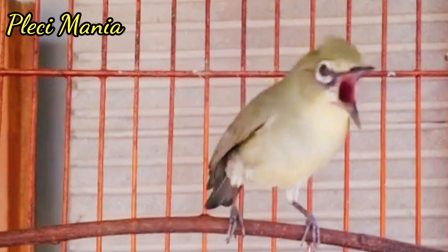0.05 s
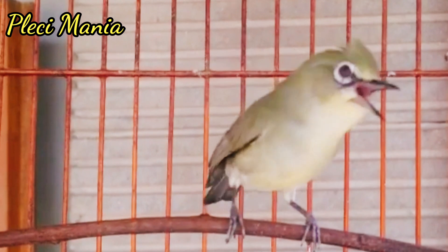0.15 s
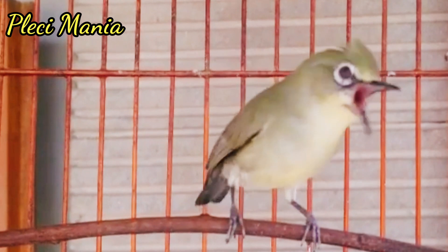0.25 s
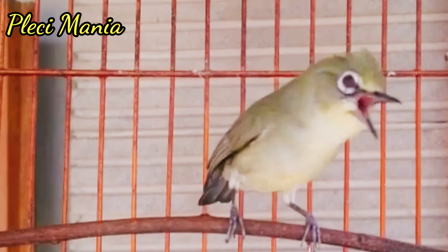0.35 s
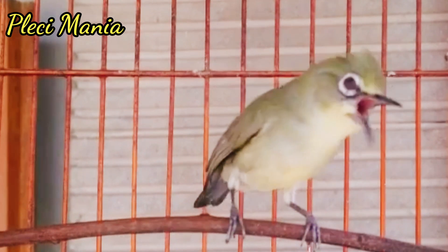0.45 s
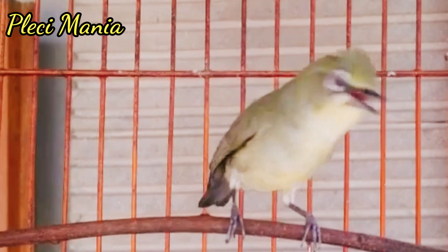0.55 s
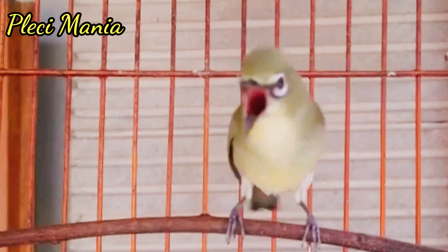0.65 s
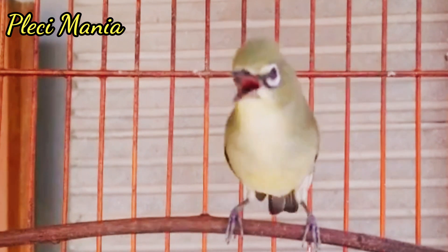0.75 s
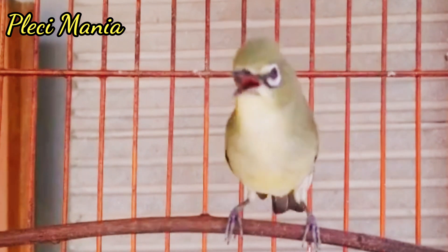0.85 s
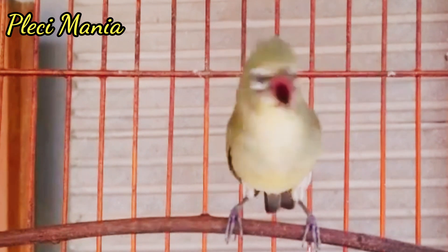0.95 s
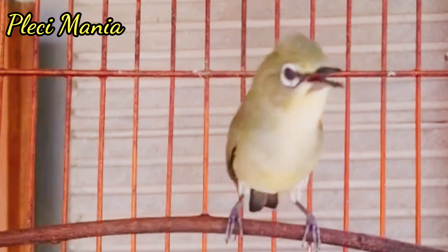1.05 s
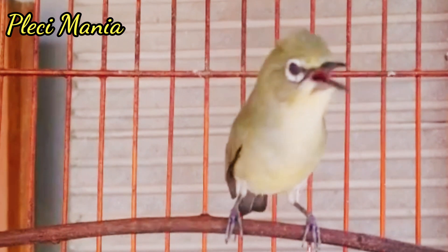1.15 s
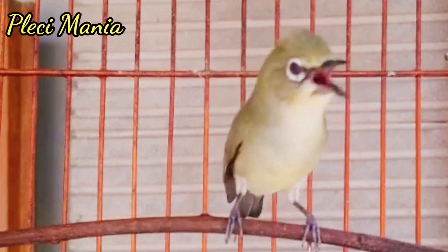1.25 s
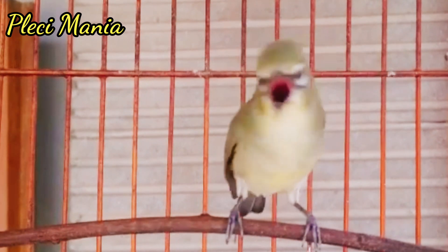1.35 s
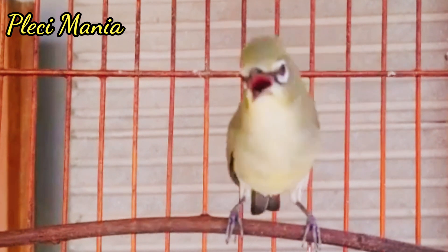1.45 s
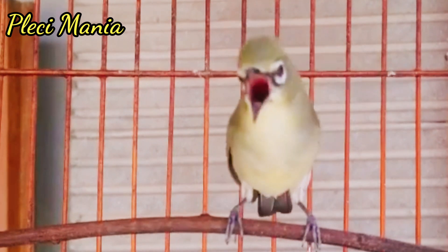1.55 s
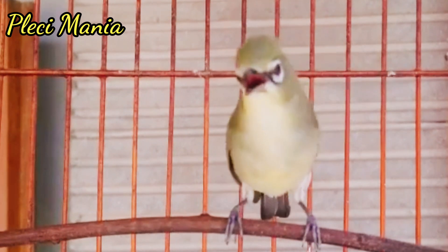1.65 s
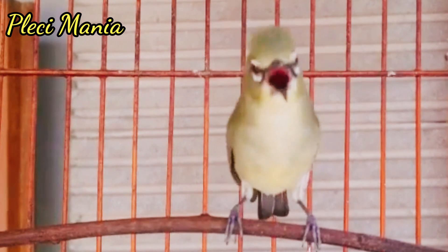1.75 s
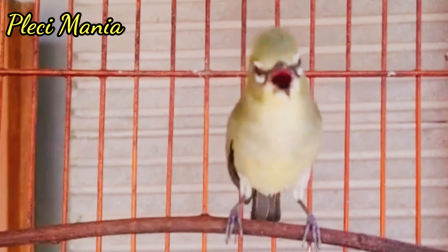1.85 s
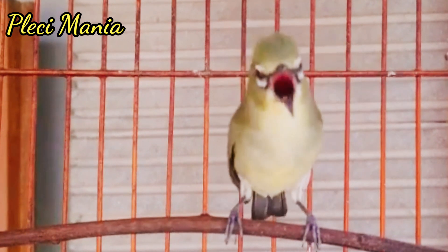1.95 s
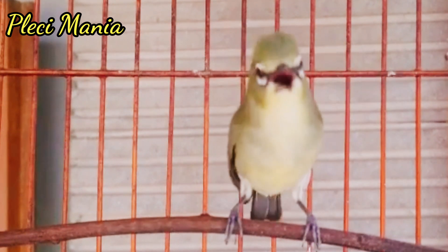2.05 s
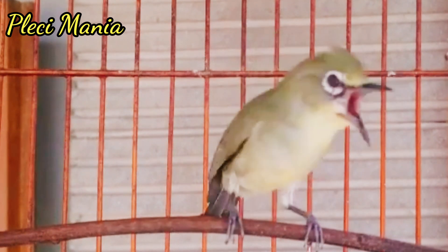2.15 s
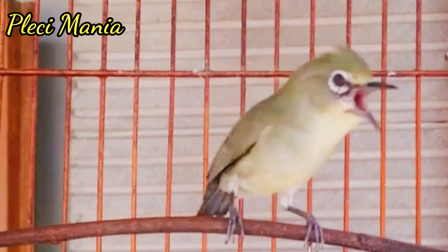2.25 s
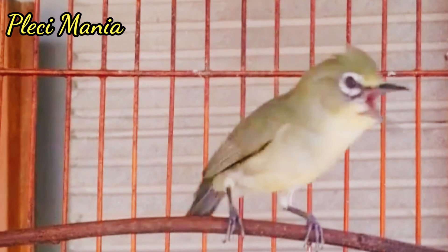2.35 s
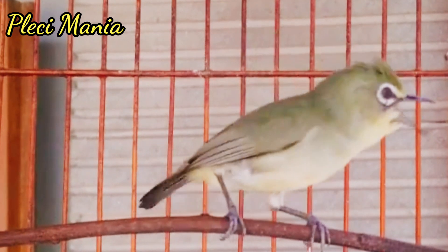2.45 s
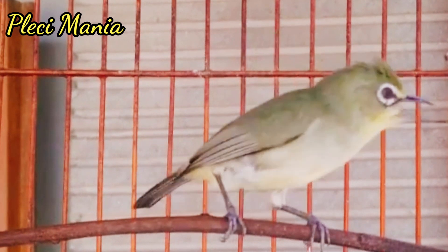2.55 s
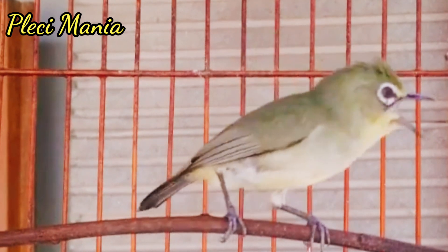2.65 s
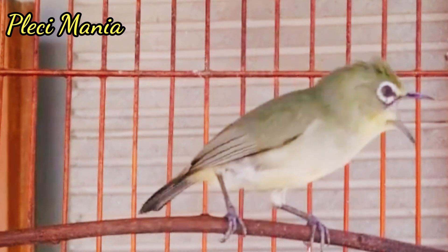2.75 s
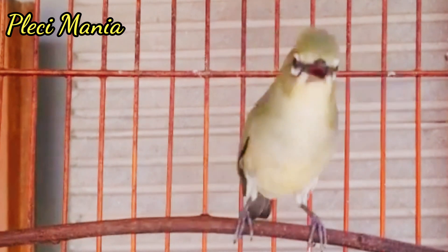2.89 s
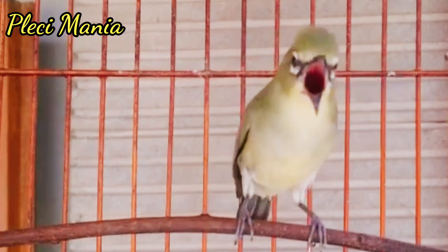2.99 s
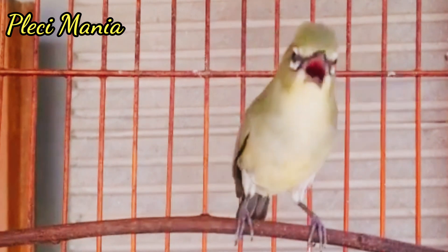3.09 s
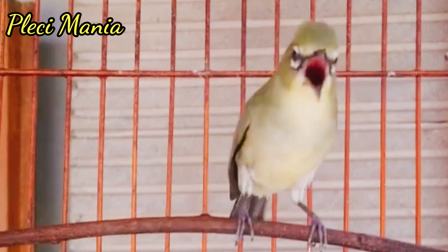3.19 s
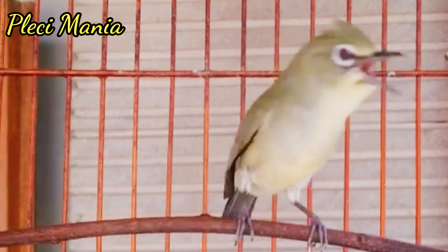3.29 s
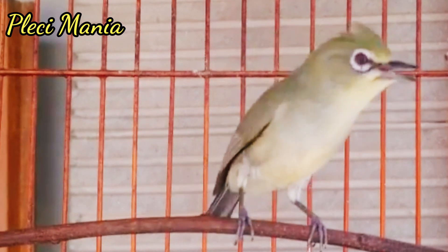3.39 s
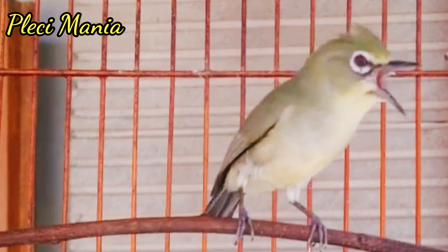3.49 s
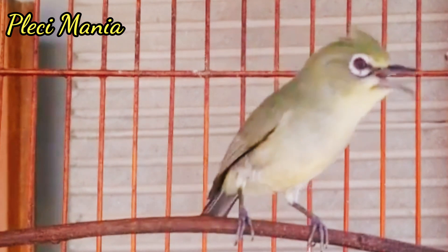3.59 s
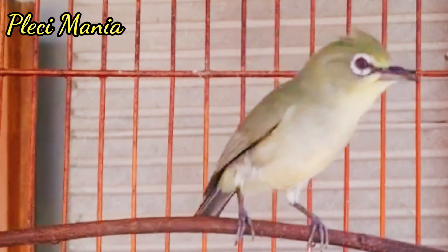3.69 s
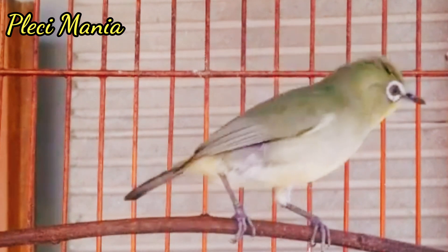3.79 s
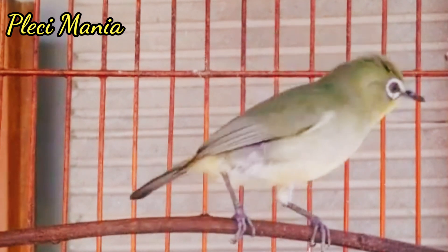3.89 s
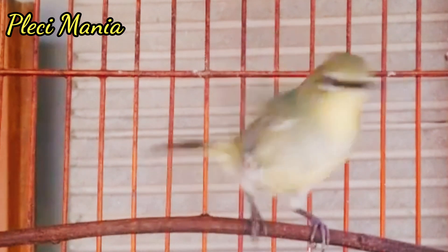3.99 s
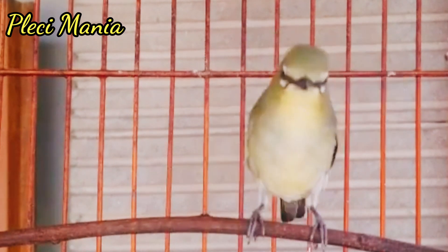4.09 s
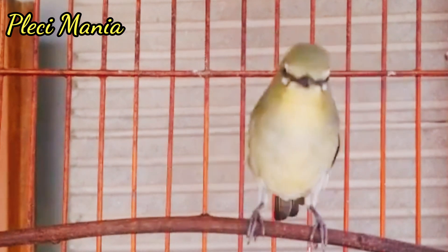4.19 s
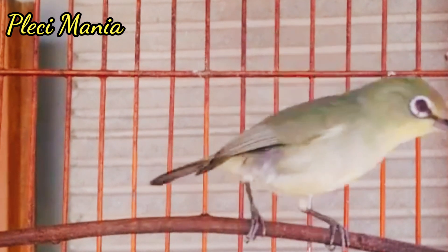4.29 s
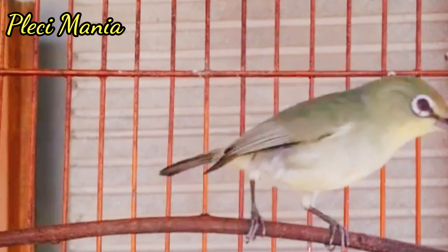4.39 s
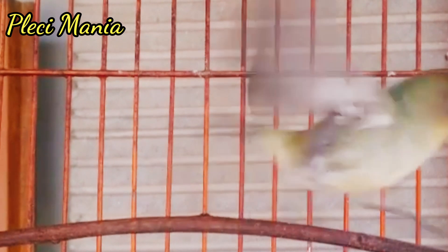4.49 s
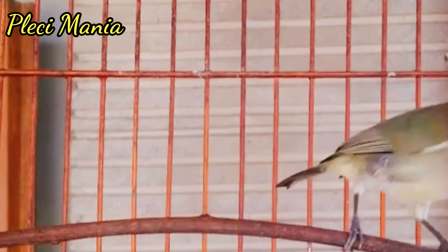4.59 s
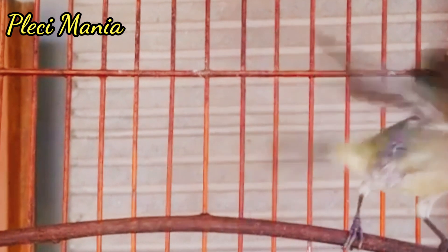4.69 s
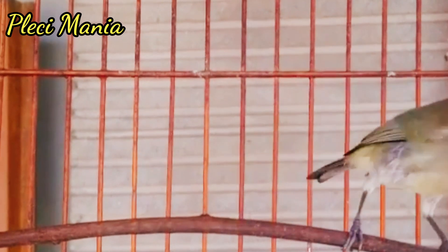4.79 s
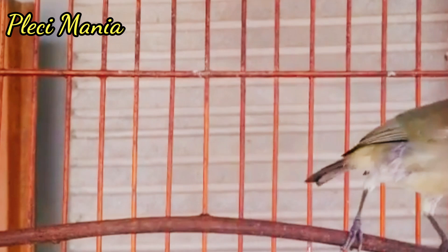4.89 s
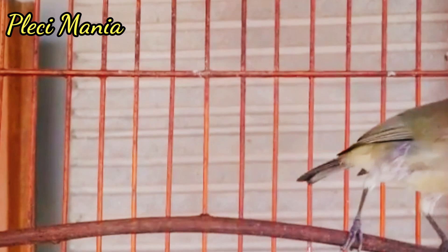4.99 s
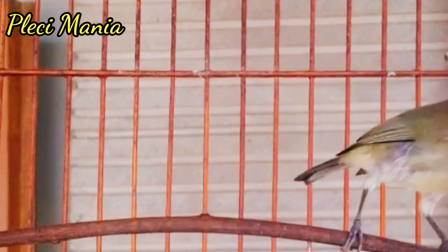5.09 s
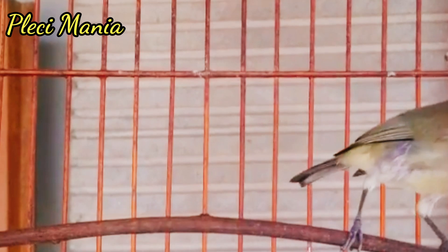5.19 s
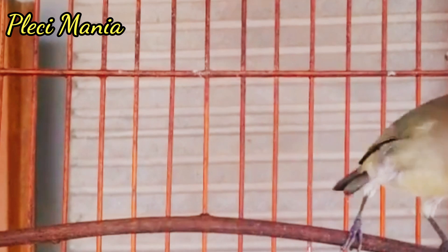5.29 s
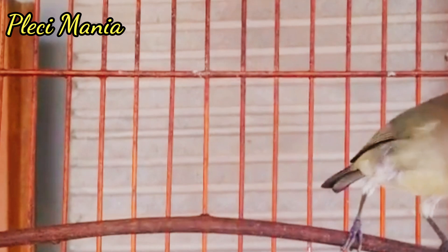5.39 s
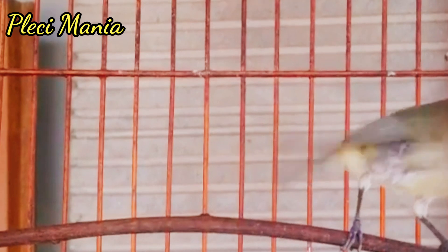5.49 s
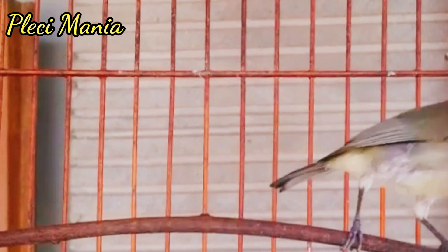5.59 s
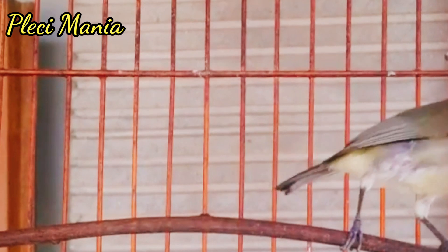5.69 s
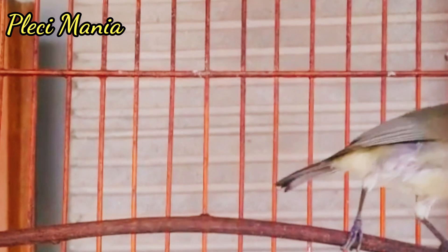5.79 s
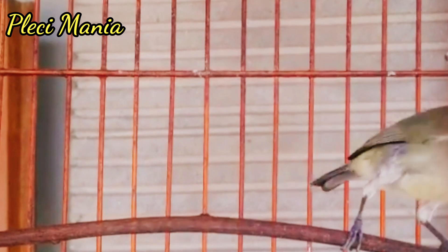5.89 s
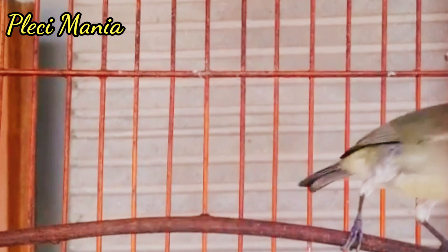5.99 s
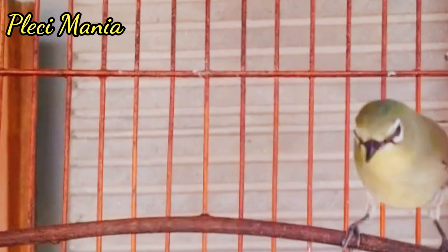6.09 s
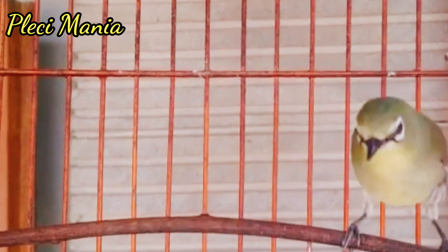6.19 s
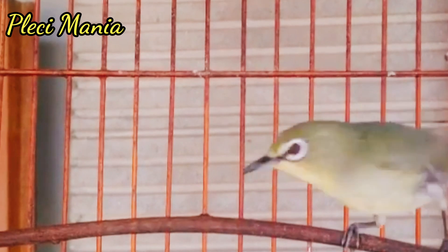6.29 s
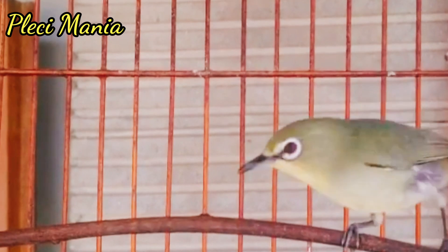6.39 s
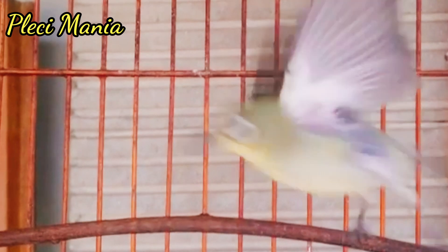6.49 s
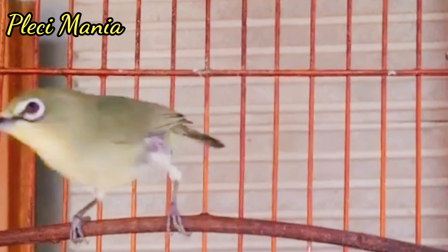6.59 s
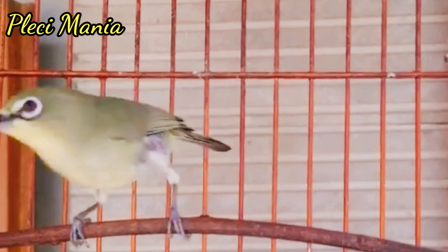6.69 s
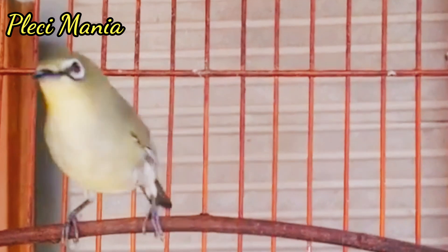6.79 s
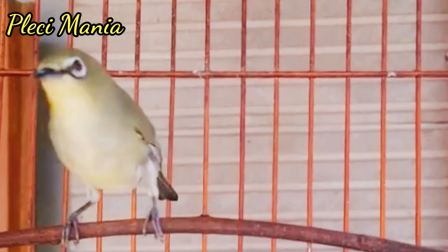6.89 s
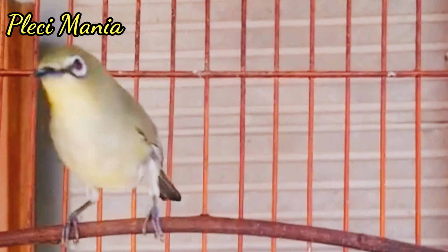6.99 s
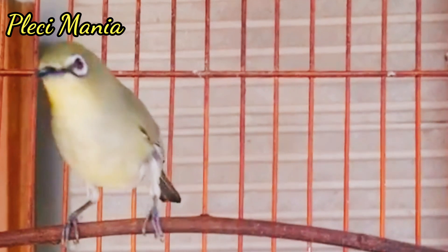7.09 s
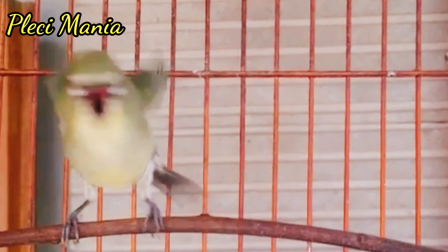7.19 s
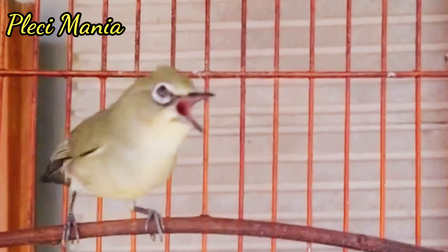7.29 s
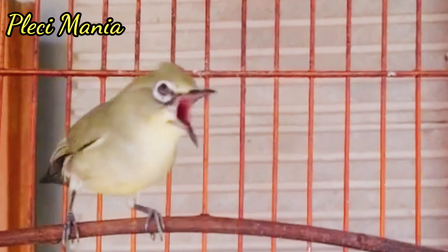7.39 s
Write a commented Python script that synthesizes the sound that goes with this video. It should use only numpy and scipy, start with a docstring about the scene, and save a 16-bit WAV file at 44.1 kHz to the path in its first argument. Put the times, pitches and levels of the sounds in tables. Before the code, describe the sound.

Outdoors in a quiet yard, a little bird delivers eighteen crisp, piercing chirps in quick succession, most diving from very high to high pitch, a couple bending upward. Then it falls silent. Low, dull town noise and a faint passing vehicle remain, with tiny far-off bird calls blurred by echo and a barely audible shuffle on the perch. A final bright chirp is cut off at the end.

```python
"""A small caged songbird sings quick falling whistles close to a two-microphone phone, pauses, then starts again.
Each note is a gliding sine with a faint half-pitch line and overtones; decaying noise makes the cage and yard echo.
The bird shifts on its perch in bursts of noise, and far birds are short whistles heard only through echoes.
A vehicle drifts past as two wavering sines, over a town made of flickering bands of noise."""
import sys
import numpy as np
from scipy import signal
from scipy.fft import rfft, irfft
from scipy.io import wavfile
from scipy.ndimage import uniform_filter1d

SR = 44100
rng = np.random.default_rng(int(sys.argv[2]) if len(sys.argv) > 2 else 0)


def master(y):
    """Save y as 16-bit WAV."""
    cut = np.clip(np.atleast_2d(y).T, -1, 1)
    pcm = np.round(cut * 32767)  # scale
    wavfile.write(sys.argv[1], SR, pcm.astype(np.int16))


def level_to_linear(level):
    """Convert decibel levels to linear amplitude factors, elementwise."""
    exponent = np.asarray(level, float) / 20
    return 10 ** exponent


N = 328545
T = np.arange(N) / SR

# how loud each pitch leaves throat, beak and cage: f/Hz, level/dB
THROAT_RESPONSE = [(3000, -34), (3500, -10.5), (4000, -2.5), (4420, 1.5), (4780, -6), (5200, -0.02),
                   (5850, 5), (6350, -5), (6800, -3), (7250, 1.5), (7700, -5.5), (8100, -14.5), (9300, -25)]


def singer():
    """Each note is a gliding sine with faint rough partials; returns both microphones and the sound sent to the yard."""
    # pitch of each note from its top on, one list per note: t/s, f/Hz
    song = [
        [(.211, 9410), (.216, 7920), (.232, 7200), (.245, 5670), (.252, 5790), (.258, 5330), (.308, 5016),
         (.321, 4660), (.368, 4640)],
        [(.432, 9170), (.458, 7160), (.486, 7170), (.495, 6040), (.505, 5910), (.529, 6030), (.54, 5050),
         (.571, 4890), (.588, 5040)],
        [(.637, 7780), (.646, 6860), (.659, 6550), (.664, 5650), (.67, 5200), (.695, 5040), (.702, 4440),
         (.74, 3940), (.759, 4120), (.766, 3900)],
        [(.832, 7820), (.838, 7180), (.852, 6700), (.864, 5710), (.88, 5170), (.885, 5860), (.895, 4740),
         (.917, 4560), (.94, 4040)],
        [(.982, 6480), (.99, 6140), (.994, 5600), (1.001, 5600), (1.006, 4590), (1.017, 4600), (1.021, 4150),
         (1.047, 3720), (1.061, 3570)],
        [(1.114, 7780), (1.118, 6880), (1.127, 6380), (1.132, 6440), (1.141, 5200), (1.181, 5194),
         (1.186, 4570), (1.195, 4500), (1.2, 4630), (1.207, 4110), (1.233, 4030)],
        [(1.288, 2870), (1.298, 3490), (1.31, 3900), (1.335, 4200), (1.347, 4120), (1.355, 4640), (1.372, 4590),
         (1.383, 4165), (1.39, 5220), (1.402, 5415), (1.415, 4580)],
        [(1.493, 9170), (1.512, 7240), (1.517, 7800), (1.529, 5830), (1.538, 5900), (1.545, 5190), (1.58, 4760),
         (1.605, 4370), (1.637, 4090)],
        [(1.709, 6840), (1.714, 7270), (1.73, 6300), (1.736, 6470), (1.743, 5610), (1.768, 5120), (1.775, 5780),
         (1.784, 5380), (1.789, 5500), (1.795, 4610), (1.806, 4540), (1.818, 3790)],
        [(1.874, 2960), (1.889, 3605), (1.893, 3820), (1.929, 3898), (1.937, 4270), (1.945, 4755),
         (1.959, 4870), (1.978, 4085), (1.986, 5150), (1.991, 5400), (2.001, 5060)],
        [(2.079, 9300), (2.098, 7340), (2.104, 7640), (2.116, 5770), (2.124, 6020), (2.132, 5226),
         (2.201, 4300), (2.217, 4020)],
        [(2.321, 9350), (2.331, 7300), (2.336, 6430), (2.35, 6170), (2.356, 6350), (2.36, 7760), (2.377, 7220),
         (2.4, 6400), (2.426, 5510), (2.457, 4280)],
        [(2.527, 8130), (2.535, 7650), (2.541, 6990), (2.549, 7260), (2.559, 5640), (2.567, 4820),
         (2.604, 4180), (2.623, 4130), (2.629, 5450), (2.642, 5490), (2.647, 5660), (2.653, 4970), (2.67, 4910)],
        [(2.772, 8240), (2.792, 7180), (2.798, 6880), (2.81, 5570), (2.815, 6300), (2.82, 6190), (2.828, 5570),
         (2.846, 5130), (2.864, 4850), (2.871, 4970), (2.876, 5440)],
        [(2.951, 7900), (2.955, 6960), (2.973, 7060), (2.978, 6020), (2.999, 5430), (3.023, 5030),
         (3.036, 5470), (3.048, 4900), (3.056, 5050), (3.06, 4910), (3.088, 4200)],
        [(3.184, 8630), (3.194, 8200), (3.203, 7050), (3.212, 7020), (3.226, 5640), (3.233, 5990),
         (3.247, 5850), (3.256, 5120), (3.265, 5220), (3.274, 4890), (3.315, 4145)],
        [(3.394, 7270), (3.401, 6190), (3.427, 5830), (3.434, 5270), (3.46, 5240), (3.467, 6410), (3.482, 6050),
         (3.489, 5360), (3.515, 4735), (3.546, 4240)],
        [(3.654, 9350), (3.664, 7810), (3.673, 7730), (3.678, 7030), (3.689, 6590), (3.758, 5375),
         (3.774, 5100), (3.786, 4900)],
        [(7.39, 8550), (7.399, 7950), (7.414, 6530), (7.425, 5940), (7.449, 5663)],
    ]
    # how each note is sung: effort/dB, brightness/(dB per kHz), shift of the response/%,
    # level of the opening flick relative to the effort/dB (None: no flick)
    efforts = [(-18, 0.15, .5, -18.5), (-19.5, 1.5, -0.37, None), (-17.5, 1, -1.5, -17),
               (-17.5, -0.6, -3, -11.5), (-18.5, 0.1, 0, -17.5), (-19.5, -0.27, -1.5, -22.5),
               (-22, -3.05, .5, None), (-19.5, 0.54, 1.5, None), (-18.5, -.5, .5, -12.5),
               (-24, -5.3, -1.5, None), (-20, 1.54, 1.5, None), (-19.5, 0.1, .5, -10.5),
               (-19.5, 0.4, .5, -6), (-21.5, -1.7, -2, None), (-19.5, 0.1, .5, -20.5), (-20, 1.74, .5, -11),
               (-19, 1.4, 1.8, -7.5), (-21, 1.4, -.5, -13), (-16.5, 0.4, .5, -11)]
    # where the head is for each note: left lags right by/microseconds, left minus right/dB
    head = [(-132.0, -2), (40.5, 1.6), (58, -0.7), (-2.5, 1), (3, 1), (13.5, 0), (49, -4.5), (14, 0.5),
            (0.5, 0.5), (27, 0.5), (4.5, 2), (36, 0.85), (-116.0, -1.2), (74, -2), (242, -4), (20.5, 1),
            (-142.0, -0.5), (63, -3), (-196.0, 8.5)]
    # how the two microphones differ for a near source: f/Hz, left minus right/dB, left leads by/radians
    mics = [(3500, 9, 0.43), (4100, 4, 0.16), (4500, 10.5, -0.8), (4800, -2.3, 0.28), (5200, 6, -0.19),
            (5600, -3.5, 0.1), (5993, -2, 0.4), (6300, -2.2, 2.1), (6550, 4, -1.5), (7200, -4, 0.7),
            (7200, -16, 2), (7600, -0.5, 1.5), (8200, -1.5, -0.47)]
    # the throat passes the middle of the range, so high notes show more of their half pitch:
    # pitch f/Hz, level of the half-pitch line before roughening/dB
    half_pitch = [(4000, -59), (5000, -57), (6000, -58), (7300, -47), (8200, -24), (8900, -4)]

    near, out = np.zeros((2, N)), np.zeros(N)
    flutter_db = walk(200)
    waver = 1 + .007 * walk(400)
    rough = rasp(450)
    breath = rasp(2600) * np.sin(2 * np.pi * 6000 * T)  # a band of noise around 6 kHz
    patchy = level_to_linear(3 * walk(40) - 2)
    mic_hz, mic_db, mic_lead = np.transpose(mics)
    half_hz, half_db = np.transpose(half_pitch)

    for curve, effort, (lag_us, side_db) in zip(song, efforts, head):
        span, hz, db = contour(curve, *effort)
        age = T[span] - T[span.start]
        hz = hz * waver[span]
        fade_in = np.clip(age / .002, 0, 1)
        fade_out = np.clip((curve[-1][0] + .004 - T[span]) / .004, 0, 1)
        size = np.sqrt(2) * level_to_linear(db + flutter_db[span]) * fade_out * fade_in
        phase = 2 * np.pi * np.cumsum(hz) / SR

        half = level_to_linear(np.interp(hz, half_hz, half_db)) * patchy[span]
        # the octave is strong until the voice settles
        octave = (level_to_linear(-37) + level_to_linear(-17) * np.exp(-age / 0.005)) * beak(2, hz)
        third = level_to_linear(-53) * beak(3, hz) * (hz > 3900)
        puff = level_to_linear(-44.0) * age / .004 * np.exp(-age / 0.006)

        # microphone phase difference, then the delay due to the head's place
        lead = uniform_filter1d(np.interp(hz, mic_hz, mic_lead), size=88) - 2 * np.pi * hz * lag_us * 1e-6
        pan_db = uniform_filter1d(np.interp(hz, mic_hz, mic_db), size=88) + side_db
        for ch, sign in enumerate((.5, -.5)):  # left, right
            p = phase + sign * lead
            upper = octave * np.sin(2 * p) + level_to_linear(-57) * np.sin(3 * p / 2) + third * np.sin(3 * p)
            partials = half * np.sin(p / 2) + upper
            voice = np.sin(p) + partials * (.7 + .8 * rough[ch, span])
            pan = np.sqrt(2 / (1 + level_to_linear(-4 * sign * pan_db)))
            near[ch, span] += size * voice * pan + puff * breath[ch, span]
        out[span] += size * voice + puff * breath[0, span]  # the yard gets the right-hand voice, unpanned

    second = second_voice()
    return near + second, out + second


def contour(curve, effort_db, bright_db, shift, flick_db):
    """Pitch and level of one note: loudness follows the response at the sung pitch, between attack and release."""
    # trills inside the rising notes, where pitch jumps up and slides back: t/s, length/s, depth/Hz
    trills = [(1.308, 0.023, 301.8), (1.892, 0.028, 326.6)]
    trill_per_s = 110
    flick_hz, flick_hold_s, flick_rise_s, flick_swell_db = 3900, .003, .0045, -16
    attack_db, attack_s, settle_s = -0.5, 0.022, .004
    release_db, release_s = -18.5, .006
    middle_hz = 5500  # brightness tilts the level around this pitch

    s, hz = np.transpose(curve)
    top = s[0]
    if flick_db is not None:
        # a flick starts low and shoots up to the top of the note
        s = np.r_[top - flick_rise_s - flick_hold_s, top - flick_rise_s, s]
        hz = np.r_[.92 * flick_hz, flick_hz, hz]
    span = slice(int(s[0] * SR), min(int((s[-1] + .004) * SR), N))
    t = T[span]
    hz = np.interp(t, s, hz)
    for start, length, depth_hz in trills:
        slide = 1 - (t - start) * trill_per_s % 1
        hz = hz + depth_hz * slide * (t > start) * (t < start + length)
    hz = uniform_filter1d(hz, size=44)

    db = np.interp(hz * (1 + shift / 100), *np.transpose(THROAT_RESPONSE))
    db = db + bright_db * (hz - middle_hz) / 1000
    if flick_db is None:
        db = db + attack_db * np.clip(1 - (t - top) / attack_s, 0, 1)
    else:
        settled = np.clip((t - top) / settle_s, 0, 1)
        before_top = np.clip((top - .001 - t) / (flick_rise_s + flick_hold_s), 0, 1)
        db = settled * db + (1 - settled) * (flick_db + flick_swell_db * before_top)
    if span.stop < N:  # a note running to the very end gets no release
        db = db + release_db * np.clip(1 - (s[-1] - t) / release_s, 0, 2)
    return span, hz, effort_db + uniform_filter1d(db, size=66)


def beak(order, hz):
    """Gain of an overtone: the beak at its own pitch, with most of the response at the sung pitch undone."""
    # how the overtones pass the beak: f/Hz, level/dB
    treble = [(6500, -9), (8000, -5.5), (8900, 1), (9700, -4.5), (10500, 3.5), (11400, .5), (12600, 4),
              (13300, 0), (15000, -7)]
    beak_db = np.interp(order * hz, *np.transpose(treble))
    return level_to_linear(beak_db - 0.76 * np.interp(hz, *np.transpose(THROAT_RESPONSE)))


def second_voice():
    """The other side of the voice box joins in below the tune: a short wavering whistle."""
    # t/s, length/s, from f/Hz, to f/Hz, level at its middle/dB
    low_whistles = [(0.64, 0.024, 5737, 5200, -26)]
    out = np.zeros(N)
    for s, length, from_hz, to_hz, db in low_whistles:
        u = np.clip((T - s) / length, 0, 1)
        hz = (from_hz + (to_hz - from_hz) * u) * (1 + 0.022 * walk(300))
        swell = np.abs(np.sin(np.pi * u)) ** .5
        out = out + np.sqrt(2) * level_to_linear(db) * swell * np.sin(2 * np.pi * np.cumsum(hz) / SR)
    return out


def rustles():
    """The bird shifts on its perch: bursts of broad noise that start at once and fade."""
    # t/s, fading time constant/s, gain at the start/dB
    bursts = [(6.133, 0.08, -57), (6.385, .06, -64)]
    broad = signal.butter(2, [500, 6500], "band", fs=SR, output="sos")
    noise = signal.sosfilt(broad, rng.standard_normal((2, N)))
    level = 0
    for s, fade_s, db in bursts:
        level = level + level_to_linear(db) * (T > s) * np.exp(-np.abs(T - s) / fade_s)
    return noise * level


def far_birds():
    """Falling whistles, fast at first, blurred by moving air and heard only through their echoes."""
    # t/s, length/s, from f/Hz, to f/Hz, peak level before blur and echoes/dB
    far_calls = [(0.015, 0.21, 7600, 4800, -53), (3.928, 0.16, 4600, 4480, -59),
                 (3.935, 0.2, 7640, 5474, -51.5), (4.175, 0.091, 5150, 4100, -51),
                 (4.696, 0.084, 5960, 5400, -65), (5.353, 0.12, 6830, 6300, -72),
                 (5.644, 0.11, 5720, 5200, -62), (5.847, 0.07, 8200, 6840, -60),
                 (6.297, 0.22, 6160, 5200, -66), (6.774, 0.094, 7200, 6500, -72),
                 (6.91, 0.063, 5430, 5200, -67), (7.009, 0.1, 7660, 6950, -68.5),
                 (7.213, 0.094, 5560, 4940, -59)]
    out = np.zeros(N)
    for s, length, from_hz, to_hz, db in far_calls:
        u = np.arange(int(length * SR)) / (length * SR)
        hz = to_hz + (from_hz - to_hz) * (1 - u) ** 1.9
        swell = np.sqrt(np.sin(np.pi * u))
        i = int(s * SR)
        out[i:i + len(u)] += level_to_linear(db) * swell * np.sin(2 * np.pi * np.cumsum(hz) / SR)
    return echoes(out * (.5 + rasp(200)[0]), 0.62, 0, 8200)


def vehicle():
    """A gear whine and an engine note, both unsteady, sinking in pitch as the vehicle passes."""
    # course, before the unsteadiness: t/s, whine f/Hz, whine level/dB, engine f/Hz, engine level/dB
    passing = [(4.5, 1828, -85, 202.5, -115), (5.0, 1808, -83, 203.6, -79), (5.448, 1758, -71, 200, -69),
               (5.697, 1623, -74, 195, -73), (5.95, 1558, -82, 153.4, -55.5),
               (6.25, 1534, -75.5, 149.4, -53.5), (6.501, 1567, -95, 122.2, -69),
               (6.7, 1533, -94.5, 121.4, -85)]
    s, *columns = np.transpose(passing)
    whine_hz, whine_db, engine_hz, engine_db = (np.interp(T, s, c) for c in columns)
    whine_phase = 2 * np.pi * np.cumsum(whine_hz * (1 + 0.0098 * walk(11))) / SR
    whine_size = level_to_linear(whine_db + 1.9 * walk(40)) * (0.93 + 1.5 * rasp(45)[0])
    whine = whine_size * np.sin(whine_phase)
    engine = level_to_linear(engine_db + 2 * walk(18)) * np.sin(2 * np.pi * np.cumsum(engine_hz) / SR)
    heard = (whine + engine) * (T > s[0]) * (T < s[-1])
    return from_street(heard, 0, 1)


def town():
    """Half-octave bands that flicker alone; the road swells those above the bass; only the bass is alike left and right."""
    # colour of the town noise at its quietest, relative: f/Hz, level per Hz/dB
    quiet_colour = [(20, -30), (32, -15.5), (50, 0.5), (85, 6.5), (186, -7.5), (300, -15), (600, -25),
                    (1000, -27), (1800, -25.5), (2800, -28.5), (4000, -24), (5500, -27), (8000, -36),
                    (13000, -52)]
    # road noise over the quiet level, before each band takes its share: t/s, level/dB
    road = [(0, 9.5), (1, -1), (2.2, 0.9), (3, 7), (3.7, 11), (4.1, 6.5), (4.45, 3.5), (4.9, 9), (5.4, 12),
            (5.8, 12.5), (6.15, 12), (6.45, 10.5), (6.65, 4.5), (7.45, 2)]
    f = np.maximum(np.fft.rfftfreq(N, 1 / SR), 1)
    colour_hz, colour_db = np.transpose(quiet_colour)
    colour = level_to_linear(np.interp(np.log(f), np.log(colour_hz), colour_db))
    colour /= np.sqrt(np.mean(colour ** 2))
    pair = rfft(rng.standard_normal((2, N))) * colour
    road_db = np.interp(T, *np.transpose(road))
    out = 0
    for hz in 22 * 2 ** np.arange(0, 10, .5):
        band = np.cos(np.pi / 2 * np.clip(2 * np.log2(f / hz), -1, 1)) ** 2
        x, y = irfft(pair * band, N)
        # the road's share grows above 60 Hz and shrinks again towards 16 kHz
        swell = np.clip(np.log2(hz / 60) / 4, 0, 1) * np.clip(np.log2(16000 / hz) / 1.7, 0, 1)
        likeness = np.clip(.25 + 0.75 / (1 + (hz / 900) ** 2), 0, 1)
        out = out + level_to_linear(swell * road_db + 2 * walk(5)) * from_street(x, y, likeness)
    return level_to_linear(-62) * out


def from_street(x, y, likeness):
    """Sound from one side: left hears it late and the right microphone is wired inverted; y is the scattered part."""
    lag_s = 16 / SR
    late = np.interp(T - lag_s, T, x)
    return np.array([late, -likeness * x + np.sqrt(1 - likeness ** 2) * y])


def echoes(x, t60_s, gap_s, damp_hz):
    """Dense decaying reflections after a gap, different at each microphone; above damp_hz they die twice as fast."""
    t = np.arange(int(SR * t60_s)) / SR
    noise = rng.standard_normal((2, SR))[:, :len(t)] * (t > gap_s)
    dull = signal.sosfiltfilt(signal.butter(2, damp_hz, fs=SR, output="sos"), noise)
    tail = dull * level_to_linear(-60 * t / t60_s) + (noise - dull) * level_to_linear(-120 * t / t60_s)
    tail /= np.sqrt(np.sum(tail ** 2, axis=1, keepdims=True))
    return signal.fftconvolve(x[None], tail, axes=1)[:, :N]


def walk(rate):
    """Random levels held 1 / rate s and slewed twice; spread near 1."""
    k = int(SR / rate)
    held = np.repeat(rng.standard_normal(N // k + 1), k)
    return 1.6 * uniform_filter1d(uniform_filter1d(held, k), k)[:N]


def rasp(width_hz):
    """Slow noise of spread 1, one per channel: a tone multiplied by it smears into a band."""
    x = signal.sosfilt(signal.butter(2, width_hz, fs=SR, output="sos"), rng.standard_normal((2, N)))
    return x / np.std(x)


def scene():
    """Singer, the cage's quick echoes, the yard's longer tail, its input roughened by slow noise, and the background."""
    near, out = singer()
    cage = level_to_linear(-17.5) * echoes(out, 0.071, 0.0067, 9038)
    yard = level_to_linear(-24) * echoes(out * (.8 + rasp(110)[0]), .42, .015, 6300)
    return near + cage + yard + rustles() + far_birds() + vehicle() + town()


def band_limit(x):
    """A steep low-pass at the top of the band."""
    return signal.sosfilt(signal.butter(12, 14130, fs=SR, output="sos"), x)


def record(dry):
    """Low noise follows the level of the sound above 5.4 kHz; a small steady offset; the top is cut."""
    high = signal.sosfilt(signal.butter(4, 5400, "high", fs=SR, output="sos"), dry)
    deep, broad = rasp(90), rasp(820)
    high_level = np.sqrt(uniform_filter1d(high ** 2, size=1300))
    level_noise = high_level * (level_to_linear(-44.5) * deep + level_to_linear(-53) * broad)
    top_cut = signal.ellip(8, .2, 60, 13250, fs=SR, output="sos")
    mix = signal.sosfilt(top_cut, dry + level_noise - 1e-4)
    return band_limit(mix)


dry = scene()
out = record(dry)
master(out)
```